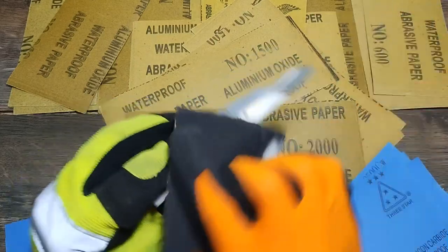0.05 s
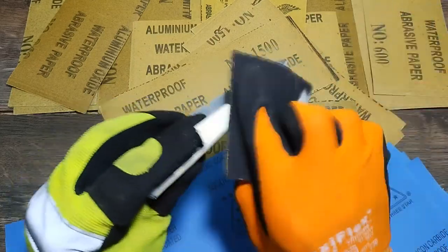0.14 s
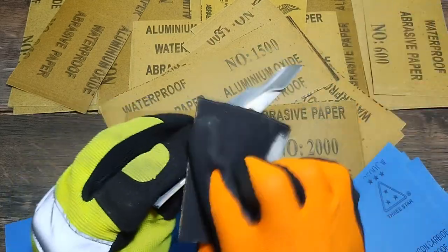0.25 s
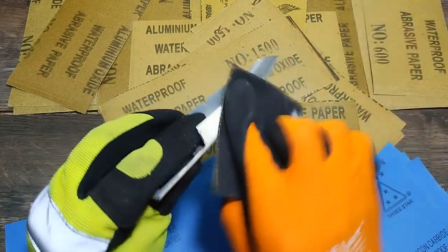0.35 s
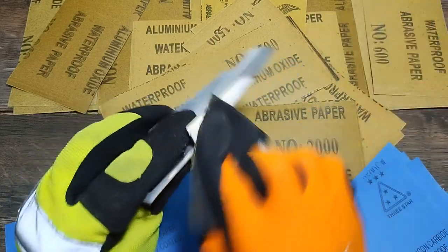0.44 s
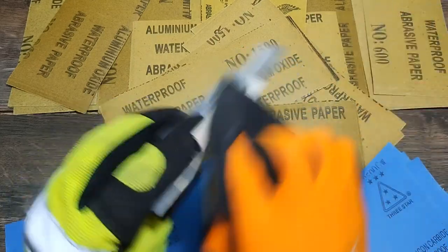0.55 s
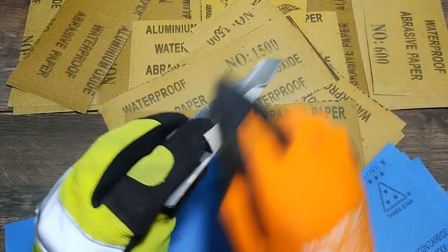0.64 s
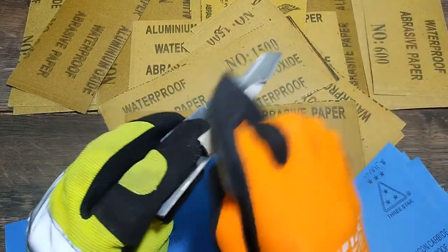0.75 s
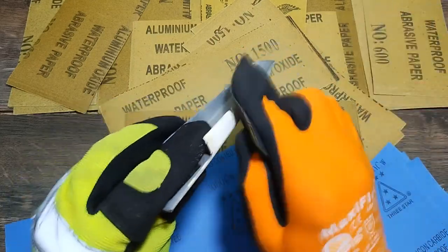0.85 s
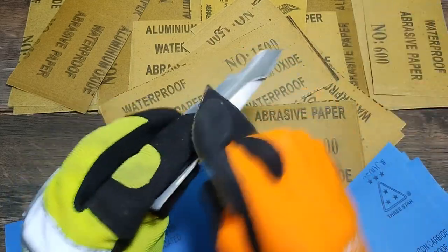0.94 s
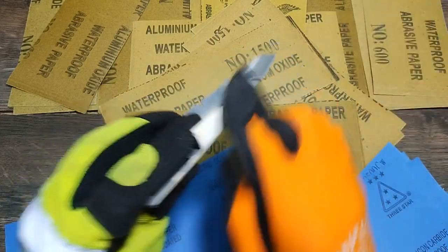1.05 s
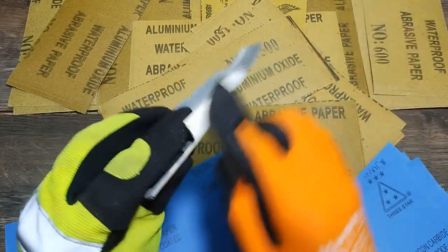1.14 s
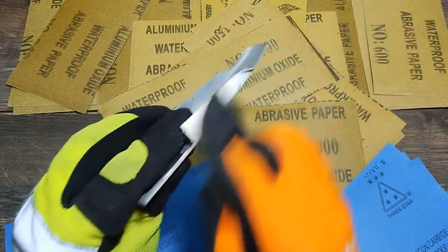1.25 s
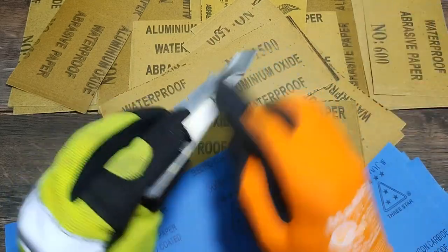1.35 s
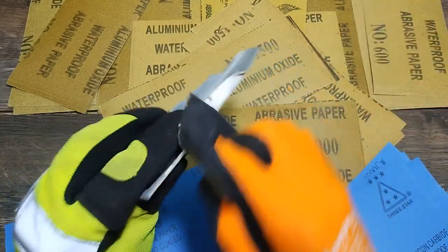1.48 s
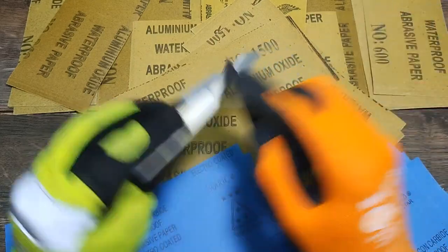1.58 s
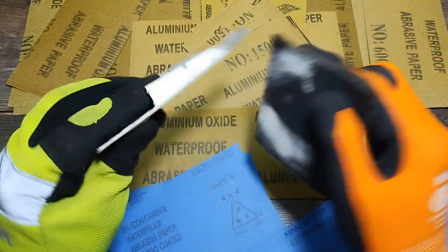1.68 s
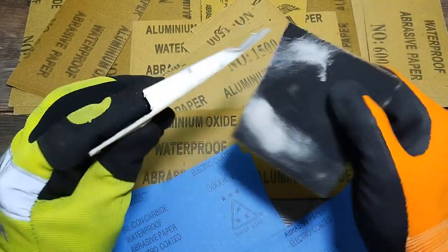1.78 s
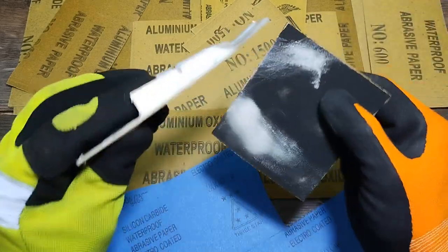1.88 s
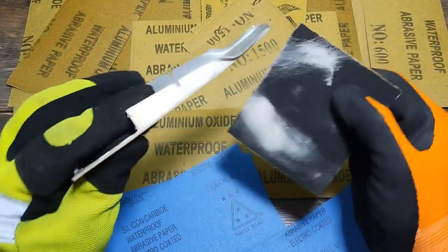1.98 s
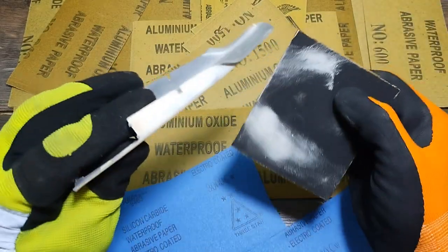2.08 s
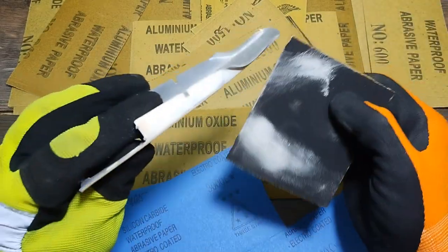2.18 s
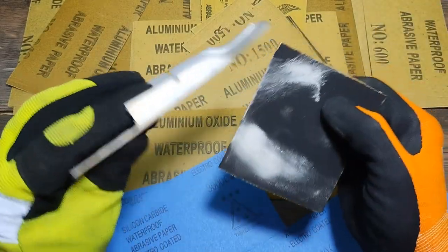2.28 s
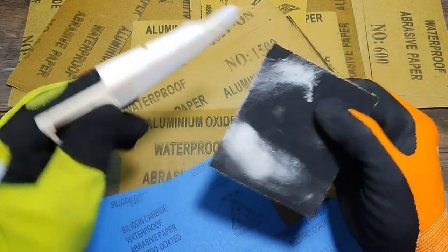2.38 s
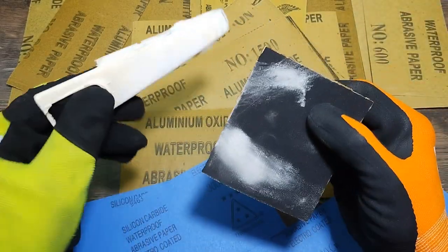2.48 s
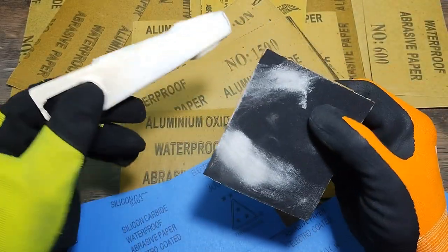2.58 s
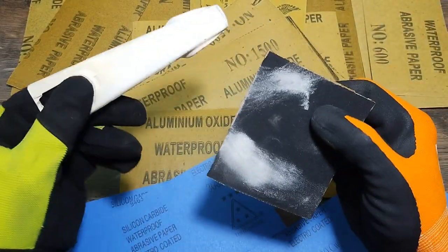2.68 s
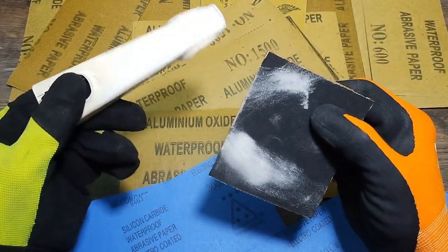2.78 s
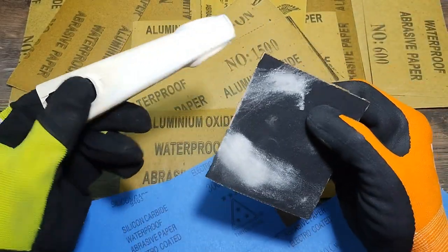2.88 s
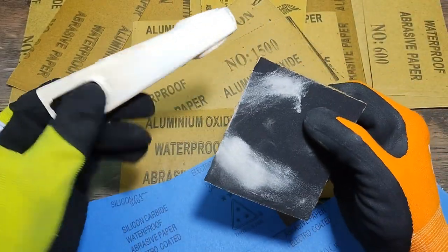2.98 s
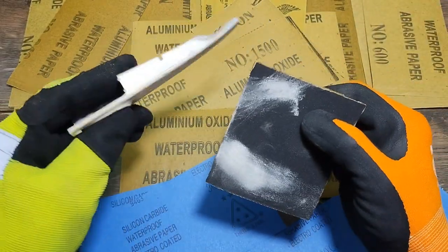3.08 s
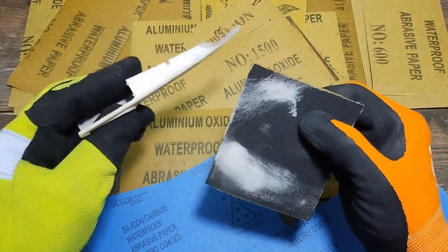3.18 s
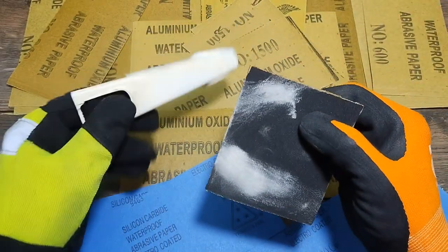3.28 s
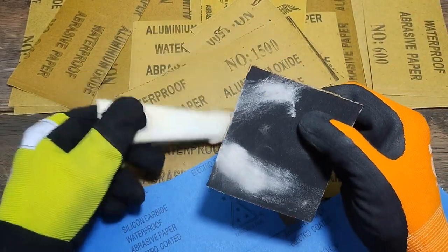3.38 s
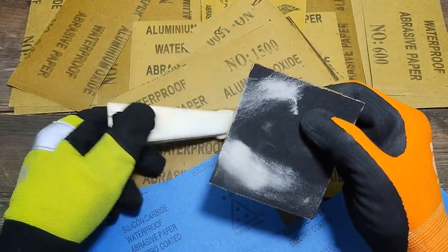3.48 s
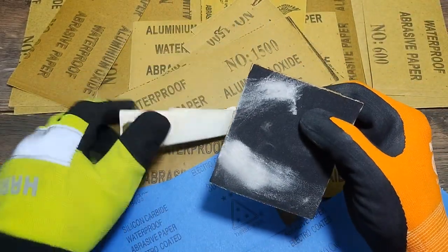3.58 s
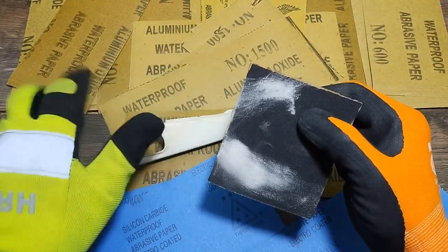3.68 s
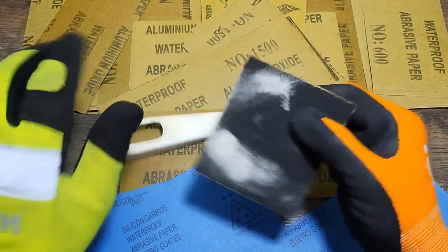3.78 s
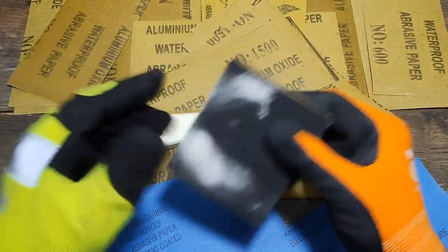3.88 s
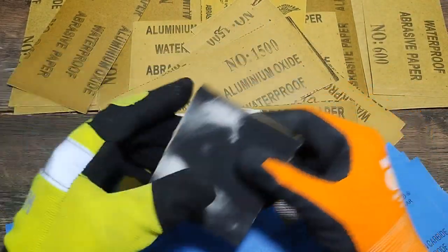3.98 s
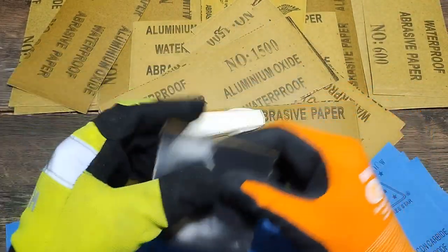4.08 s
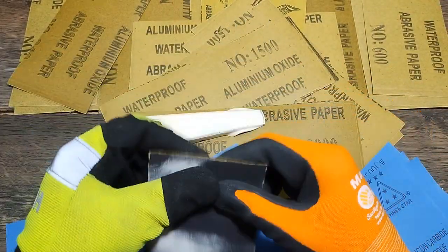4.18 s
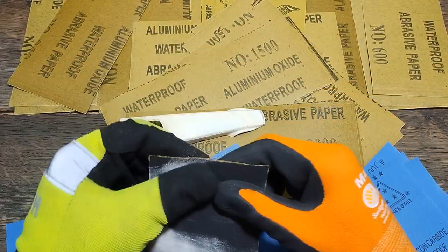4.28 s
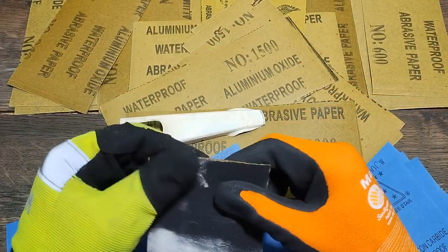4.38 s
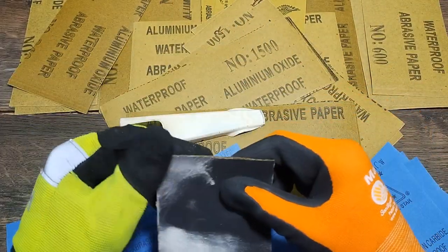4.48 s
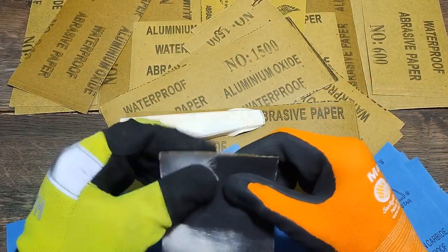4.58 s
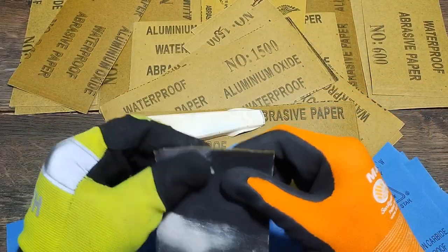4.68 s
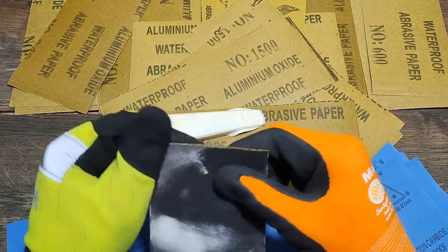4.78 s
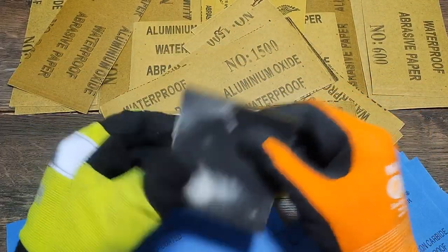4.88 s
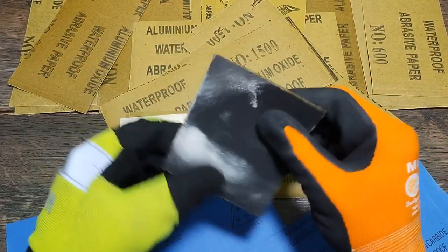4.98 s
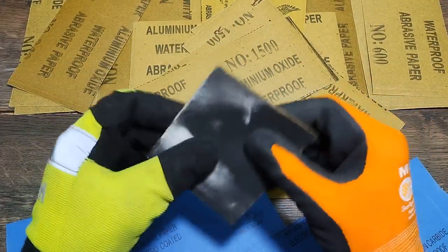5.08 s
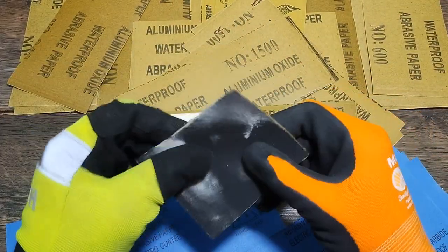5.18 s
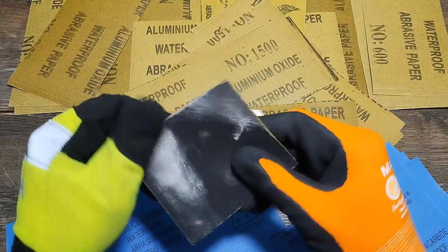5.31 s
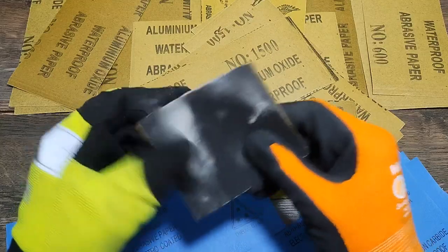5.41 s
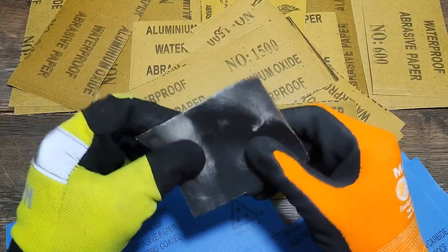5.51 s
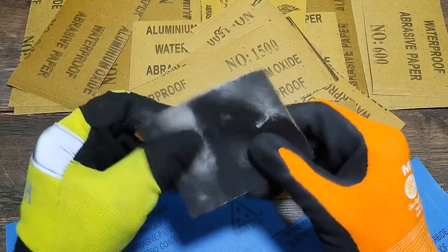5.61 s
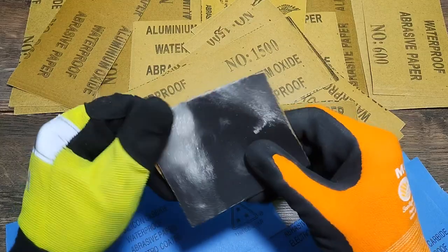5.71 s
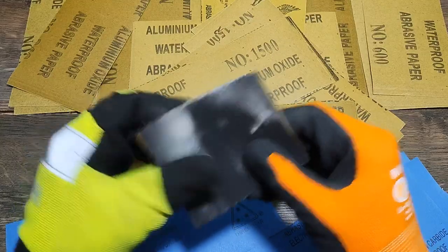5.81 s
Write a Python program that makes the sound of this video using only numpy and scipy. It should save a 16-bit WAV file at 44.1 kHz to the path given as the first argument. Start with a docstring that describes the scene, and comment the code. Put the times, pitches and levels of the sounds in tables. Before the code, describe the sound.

Close to the microphone at a workbench, a fast run of raspy sandpaper strokes works over a small piece of plastic, which ticks and knocks in the hand. The rubbing breaks off into soft glove movement, and the piece clicks down lightly. Scattered brushing swipes and tiny paper snaps follow as a finger cleans the sheet, growing stronger near the end. The room is quiet, with a faint electrical hum.

```python
"""Quick, hissing strokes of fine sandpaper on a small plastic part, heard close up at a workbench.
The grit sets part and sheet ringing; then the gloved hand stops, lays the part on the bench and wipes
the dust off the sheet with a finger. Room air and a mains hum lie underneath. The microphone has two
ports, the right one brighter."""
import sys
import numpy as np
from scipy import signal
from scipy.fft import rfft, irfft
from scipy.io import wavfile
from scipy.ndimage import uniform_filter1d

SR = 44100
rng = np.random.default_rng(int(sys.argv[2]) if len(sys.argv) > 2 else 0)


def bounce(signal):
    """Save signal as a 16-bit WAV file at the path given by the first command-line argument."""
    frames = np.transpose(np.atleast_2d(signal))
    limited = np.clip(frames, -1, 1)
    pcm = np.round(limited * 32767).astype(np.int16)
    wavfile.write(sys.argv[1], SR, pcm)


N = 257984


def from_db(db):
    return 10 ** (np.asarray(db) / 20)


def rms_one(x):
    return x / np.sqrt(np.mean(x ** 2) + 1e-20)


def filtered(x, hz, kind="band"):
    return signal.sosfilt(signal.butter(2, hz, kind, fs=SR, output="sos"), x)


def in_time(rows):
    """One curve over the whole scene for each column after the time."""
    s, *columns = np.transpose(rows)
    order = np.argsort(s, kind="stable")
    return [np.interp(np.arange(N) / SR, s[order], c[order]) for c in columns]


def at_hz(points):
    """Reads rows of frequency and value at every bin of an N-point transform."""
    hz, values = np.transpose(points)
    bin_hz = np.maximum(np.arange(N // 2 + 1) * SR / N, 1)
    return np.interp(np.log(bin_hz), np.log(hz), values)


def coloured(x, spectrum):
    return rms_one(irfft(rfft(x) * from_db(at_hz(spectrum)), N))


def drift(hz):
    """A random wander of unit spread, mostly slower than hz."""
    step, run_in = 8, 8000
    r = np.exp(-2 * np.pi * hz * step / SR)
    noise = rng.standard_normal(N // step + run_in + 2)
    slow = signal.lfilter([1], [1, -2 * r, r * r], noise)[run_in:]
    return np.interp(np.arange(N) / step, np.arange(len(slow)), rms_one(slow - slow.mean()))


def resonate(x, hz, width_hz):
    r = np.exp(-np.pi * width_hz / SR)
    gain = (1 - r * r) / 2
    return signal.lfilter([gain, 0, -gain], [1, -2 * r * np.cos(2 * np.pi * hz / SR), r * r], x)


def spread(pair):
    """Two unrelated signals become left and right, alike in the bass and unrelated in the treble."""
    # Likeness at the two ports. Each row: frequency in Hz, correlation.
    likeness = [(40, 1), (70, 0.69), (180, 0.86), (550, 0.49), (1200, 0.1), (2500, 0.42), (5000, 0)]
    alike = np.clip(at_hz(likeness), -1, 1)
    mid, side = rfft(pair)
    return irfft(np.sqrt(1 + alike) * mid + np.sqrt(1 - alike) * side * [[1], [-1]], N) / np.sqrt(2)


def hand_motion():
    """Each rub bites fast, swells, then fades; rubs add as powers and the loudest sets pitch and tilt."""
    # Sanding strokes. Each row: catch and swell time in seconds, hiss at the catch and after the swell
    # in dB, fade in dB/s, ring and flex against hiss in dB, ring pitch in Hz, treble tilt in dB/octave.
    strokes = [ (0.048, .046, -55.5, -56.5, 400, 2, -12, 1850, 3.5),
               (0.105, 0.051, -40.5, -32, 175.5, 5.5, -9, 2500, 0),
               (0.233, 0.068, -33, -27, 326, 1.5, -15.5, 2540, -1.5),
               (0.347, .046, -35, -26.5, 375, 0.5, -12.5, 2670, -1.5),
               (0.459, 0.049, -31.5, -33.5, 690, 1.5, -6, 2350, -3),
               (0.538, .04, -35.5, -31, 330, 0, -9.5, 2900, -2.5),
               (0.643, 0.019, -29.5, -32.5, 562.5, -1.5, -15, 2550, 1.5),
               (0.709, 0.014, -25, -25.5, 333.5, 2.5, -14.5, 2650, -2.5),
               (0.802, 0.037, -31, -31, 430.5, 0.5, -13, 2800, 0),
               (0.885, 0.057, -38, -38, 900, 4, -6, 2680, -2.5),
               (0.975, 0.044, -35.5, -34, 516, 2.5, -12.5, 2820, -3.5),
               (1.052, 0.042, -34, -29.5, 337, 1.5, -11.5, 3050, -3),
               (1.132, 0.014, -37.5, -25, 357.5, -1.5, -18.5, 3060, -1.5),
               (1.219, 0.04, -37.5, -36.5, 640, 4.5, -12, 2850, -0.5),
               (1.316, 0.031, -38, -39.5, 720, 2.5, -10.5, 2900, -1),
               (1.394, 0.058, -39, -36, 798, 1, -13.5, 3020, -1.5),
               (1.490, 0.051, -30.5, -30, 650.5, -4, -17.5, 3100, -1.5),
               (1.568, 0.046, -32.5, -33.5, 550.5, 1, -12.5, 2920, 0.5),
               (1.666, 0.044, -35, -36, 250.5, 1.5, -15, 2940, -1.5),
               (1.762, 0.00593, -33.5, -37.5, 651, -1, -6.5, 2700, -3.5), ]
    # Gloves shifting and a finger wiping the sheet, in the same columns.
    wipes = [ (1.915, .01, -65.5, -59.5, 132.7, 2, -7, 2090, -1),
             (2.290, .012, -77, -76.5, 300, -2, 4, 2300, 0.5),
             (2.47, .05, -76, -70.5, 60.5, 2, -6, 2400, -4.5),
             (2.87, 0.038, -81, -75, 500, -4, -6, 2300, -1),
             (3.125, .02, -70, -69, 250, -11, -12, 2320, -5),
             (3.40, 0.083, -79, -75.5, 89.5, -9, -10, 2150, -2.5),
             (3.62, 0.11, -69.5, -65, 340, -5, -5, 2330, -4),
             (4.004, 0.066, -69.5, -66, 400, -1, -6, 2900, -3),
             (4.15, 0.059, -79.5, -71.5, 220, -1, -11, 2500, -0.5),
             (4.27, 0.11, -73.5, -61.5, 170, -6, -12, 2500, 3.5),
             (4.43, 0.078, -65, -48, 780, -4.5, -19, 3320, 4),
             (4.53, .09, -59, -54.5, 506, -3.5, -11.5, 3200, 0),
             (4.68, .025, -71.5, -69, 40.4, 2.5, -1.5, 2900, -3.5),
             (4.82, 0.045, -80, -56, 500, -6, -20, 3130, -0.5),
             (4.872, 0.05, -45, -47, 490, 4, -8, 2900, -1),
             (4.975, 0.023, -69.5, -55, 470, 2.5, -8, 3000, -6),
             (5.09, .10, -69, -58, 503, -1, -12, 2880, -3.5),
             (5.197, .036, -50.5, -52.5, 700, -7, -30, 3140, 6),
             (5.31, 0.063, -62.5, -49, 504, -6, -25, 2780, -1),
             (5.385, 0.026, -38.5, -38.5, 400, 3, -16, 2700, 0.5),
             (5.45, .01, -66, -52.5, 175, 0.5, -12, 2720, -1),
             (5.643, .006, -49, -53.5, 200, -8, -14, 3000, 7),
             (5.754, .030, -40, -30, 299, -3, -17, 3200, -2),
             (5.814, .03, -46, -51, 199, 10.5, -4, 3040, -1), ]
    # Faint glove rustle between rubs. Each row: time in seconds, hiss in dB, ring and flex against
    # hiss in dB, treble tilt in dB/octave.
    rustle = [(0, -85.5, 6, 11, 7), (.1, -69.5, 8, -1, 1.5), (1.82, -75, 4, 8, 0.5),
              (2.05, -78, 13, 10, 3.5), (2.25, -86, 18.5, 18, 2.5), (2.42, -85, 10.5, 10, 3.5),
              (2.7, -76.5, -1, -2, 2.5), (2.95, -89, 7.5, 2, 6), (3.3, -98.5, 1, 7, 1.5),
              (3.6, -79.5, 2, 3, -1.5), (3.9, -71, 1, -2, -2.5), (4.25, -80, -1, 1, -8),
              (4.75, -74.5, 2, 0.5, 0), (5.07, -78, 3, -4, -0.5), (5.28, -71.5, 6, -8, 3),
              (5.6, -74.5, 9, -15, 2.5), (5.85, -68, -5, -10, 0.5)]
    stroke_bite_s, wipe_bite_s = 0.013, 0.014   # rise from silence to the catch
    rustle_hz, flicker_db = 2300, 4
    t = np.arange(N) / SR
    hiss_db, ring_db, flex_db, tilt_db = in_time(rustle)
    hiss = from_db(hiss_db + flicker_db * drift(8.2)) ** 2
    ring, flex = hiss * from_db(2 * ring_db), hiss * from_db(2 * flex_db)
    pitch, tilt = hiss * rustle_hz, hiss * tilt_db
    rubs = [(stroke_bite_s, *row) for row in strokes] + [(wipe_bite_s, *row) for row in wipes]
    for bite_s, s, swell_s, catch_db, end_db, fade, ring_db, flex_db, hz, tilt_db in rubs:
        near = slice(int(max(s - 0.1, 0) * SR), int((s + swell_s + 0.5) * SR))
        age = t[near] - s
        bite = np.clip(1 + age / bite_s, 0, 1)
        held_db = catch_db + (end_db - catch_db) * np.clip(age / swell_s, 0, 1)
        loss_db = fade * np.maximum(age - swell_s, 0)
        power = (bite * from_db(held_db - loss_db)) ** 2
        hiss[near] += power
        # ring and flex linger, gaining on the hiss up to a limit
        ring[near] += power * from_db(2 * (ring_db + np.minimum(0.1 * loss_db, 7.5)))
        flex[near] += power * from_db(2 * (flex_db + np.minimum(0.41 * loss_db, 11)))
        pitch[near] += power * hz
        tilt[near] += power * tilt_db
    hiss_db, ring_db, flex_db = 10 * np.log10([hiss, ring / hiss, flex / hiss])
    return hiss_db, ring_db, flex_db, pitch / hiss, tilt / hiss


def grit(per_s, size_db, clump_db, clump_hz):
    """Grains catch at random, unevenly and in clumps; each reaches the two ports by different paths."""
    caught = rng.random(N) < per_s / SR
    grain_db = size_db * np.minimum(rng.exponential(1, N), 5) + clump_db * drift(clump_hz)
    return spread(caught * from_db(grain_db) * rng.standard_normal((2, N)))


def grit_hiss(tilt_db):
    """Fine grit hisses; the sheet bends, so each third of an octave swells and fades on its own."""
    # Colour of the hiss. Each row: frequency in Hz, relative level in dB.
    spectrum = [(2060, -19.5), (3500, -2.5), (4030, -2.5), (5200, -4.5), (10700, -1.5), (14200, -10),
                (14700, -25), (15000, -47.5)]
    fine = grit(per_s=15000, size_db=-1, clump_db=0.5, clump_hz=82)
    edges_hz = 3000 * 2 ** np.arange(0, 2.4, 1 / 3)
    hiss = 0
    for k, (low, high) in enumerate(zip(edges_hz, edges_hz[1:])):
        gain_db = tilt_db * np.log2(low / 7500) + 2 * drift(19)
        hiss += (-1) ** k * from_db(gain_db) * filtered(fine, [low, high])
    return coloured(hiss, spectrum)


def part_and_sheet_ring(hiss_db, focus_hz):
    """Grit drives the resonances of part and sheet: a light touch only rustles, a firm one rings."""
    # The resonances. Each row: frequency in Hz, width in Hz, relative level in dB.
    resonances = [(1607, 120, -5), (1736, 50, 1.5), (1910, 140, 0.5), (2307, 300, 3), (2845, 140, 4),
                  (3007, 110, 3), (3175, 250, 1.5), (3360, 170, -5), (3300, 130, -11.5), (4010, 600, -3)]
    # A loosely held part rings low, the bare sheet in a narrow range. Each row: time in seconds,
    # lift of the lowest resonances in dB, narrowing in dB per octave squared.
    grip = [(0, 8, 4), (.2, 0.5, -17), (.27, 8.5, 8), (.5, 9, 12), (.6, -1.5, 3), (1.8, 6, 9.5),
            (4.3, -2.5, 30), (4.9, 2, 13), (5.4, 1, 24), (5.85, -2, 15)]
    loose_db, narrow_db = in_time(grip)
    coarse = rms_one(grit(per_s=9000, size_db=0, clump_db=-0.5, clump_hz=27))
    firm = np.clip((hiss_db + 75.5) / 18, 0, 1)
    rustle = from_db(-17.5) + (1 - firm) * from_db(-19.5)
    ring = rustle * filtered(coarse, [1550, 4600])
    power = rustle ** 2 * 3200   # times the noise bandwidth in Hz
    for k, (hz, width, db) in enumerate(resonances):
        damped_db = narrow_db * np.log2(hz / focus_hz) ** 2   # the grip damps those far from its pitch
        gain = firm * from_db(db - damped_db + loose_db * (hz < 1850) + 3 * drift(4.7))
        ring += (-1) ** k * gain * resonate(coarse, hz, width)
        power += gain ** 2 * width * np.pi / 2
    ring /= np.sqrt(2 * power / SR)   # the grip moves the colour, not the level
    return filtered(ring, [1350, 5500])


def paper_flex():
    """The paper flexes under the catching grit with a low rasp."""
    # Colour of the rasp. Each row: frequency in Hz, relative level in dB.
    spectrum = [(50, -19.5), (70, -13), (206, -16.5), (242, -7), (461, -7.5), (601, -5.5), (842, -7),
                (1080, -0.5), (1350, -2.5), (1650, -8.5), (3000, -56)]
    return coloured(grit(per_s=3000, size_db=-1, clump_db=-2, clump_hz=30), spectrum)


def knocks():
    """A knock strikes all the part's modes, most those near the pitch that the struck spot favours."""
    # Fingers or bench hit the part. Each row: time in seconds, relative level in dB, favoured Hz.
    hits = [(0.11, -15, 620), (.113, -14, 1660), (.28, -21, 686), (.378, -17.5, 835), (0.39, -24, 330),
            (.488, -17.5, 630), (.7008, -9, 1750), (.7022, -11, 2500), (.7035, -15, 600),
            (.7045, -13, 2900), (.7060, -12, 2900), (.7076, -13, 2500), (1.114, -25, 590),
            (1.57, -21.5, 724), (1.733, -21, 2780), (1.762, -16.5, 1270), (3.567, -41, 1200),
            (3.609, -59, 504), (3.809, -32, 2500), (3.8097, -30.5, 323), (3.813, -35.5, 2500),
            (3.8175, -36, 2200), (3.811, -40, 730), (3.816, -36.5, 290), (3.821, -33.5, 1060),
            (3.939, -43, 1500), (3.946, -45.5, 2200), (4.344, -31.5, 900), (4.35, -38, 1110),
            (5.79, -26, 1250)]
    # Modes of the plastic. Each row: frequency in Hz, relative level in dB, seconds to fall 60 dB.
    modes = [(302, -2, 0.07), (426.7, -4.5, 0.081), (600, 0.5, 0.049), (749, -1, .04), (1085, 2.5, 0.019),
             (1285, -4, 0.062), (1517, -5, 0.058), (1697, 1, 0.015), (2194, 9, 0.0051), (2615, 6, 0.026),
             (3420, 1, .02), (4090, -5.5, 0.016)]
    s, hit_db, spot_hz = np.transpose(hits)
    port_db = rng.normal(0, 0.5, (len(s), len(modes), 2))   # a little different at each port
    out = np.zeros((2, N))
    for k, (hz, mode_db, t60) in enumerate(modes):
        strike_db = hit_db + mode_db - 14 * np.log2(hz / spot_hz) ** 2 - 13.5
        clicks = np.full((2, N), 1e-18)
        clicks[:, (s * SR).astype(int)] = from_db(strike_db[:, None] + port_db[:, k]).T
        if hz > 2500 and k % 2:   # some high modes face the ports with opposite sides
            clicks[1] *= -1
        r, w = from_db(-60 / (t60 * SR)), 2 * np.pi * hz / SR
        out += (-1) ** k * signal.lfilter([0, np.sin(w)], [1, -2 * r * np.cos(w), r * r], clicks)
    return filtered(out, 220, "high")


def snaps():
    """Paper and glove snap dryly: a crack of a few milliseconds and a tail of bright noise."""
    # Each row: time in seconds, relative level in dB, seconds for the tail to fall 60 dB.
    cracks = [(0.0423, -51, 0.05), (0.1078, -18.5, 0.08), (0.7015, -17.5, 0.055), (1.908, -46, 0.05),
              (2.3272, -48, 0.05), (3.568, -45.5, 0.073), (3.808, -32, 0.13), (3.9385, -38, 0.15),
              (4.331, -48, 0.05), (4.366, -43.5, 0.06), (4.3874, -58, 0.065), (4.7137, -45, 0.05),
              (4.7583, -43, 0.05), (5.379, -29, 0.05), (5.5116, -41, 0.05), (5.638, -52, 0.066),
              (5.6895, -44, 0.05), (5.7432, -30.5, 0.05)]
    t, envelope = np.arange(N) / SR, np.zeros(N)
    for s, db, t60 in cracks:
        age = np.maximum(t - s, 0)
        crack, tail = from_db(-60 * age / 0.027), 1.1 * from_db(-60 * age / t60)
        envelope += (t >= s) * from_db(db - 12) * (crack + tail)
    return filtered(envelope * rng.standard_normal((2, N)), [2500, 13000])


def room_air():
    """Air noise in the room around the bench, wavering slightly."""
    # Colour of the air. Each row: frequency in Hz, relative level in dB.
    spectrum = [(15, -42.5), (25, -21.5), (115, -6), (191, -12.5), (250, -5), (354, -5.5), (450, -12),
                (621, -9), (927, -16.5), (1060, -10), (1180, -18), (2020, -17.5), (11200, -38.5),
                (13800, -39), (15000, -59)]
    return from_db(-64.5 + 0.7 * drift(3.7)) * coloured(spread(rng.standard_normal((2, N))), spectrum)


def mains_hum():
    """Wavering tones near multiples of the mains frequency, alike at both ports."""
    # Each row: frequency in Hz, level in dB.
    tones = [(59.2, -72), (118.4, -74), (177.6, -77), (242.2, -70), (360.7, -69.5)]
    t, hum = np.arange(N) / SR, np.zeros(N)
    for hz, db in tones:
        level = from_db(db + 4.5 * drift(5.5))
        phase = 2 * np.pi * hz * (t + 0.0008 * drift(3.5)) + 0.51 * drift(3)
        hum += level * np.sin(phase)
    return hum


def scene():
    """Handwork at the bench in front, and behind it a room tone that swells with the loud rubbing."""
    hiss_db, ring_db, flex_db, focus_hz, tilt_db = hand_motion()
    hiss = grit_hiss(tilt_db)
    ring = from_db(ring_db) * part_and_sheet_ring(hiss_db, focus_hz)
    flex = from_db(flex_db) * paper_flex()
    rubbing = from_db(hiss_db) * (hiss + ring + flex)
    swell_from_db, swell_share, swell_s = -59.5, 0.4, 0.033
    loud_db = 10 * np.log10(uniform_filter1d(from_db(2 * hiss_db), int(swell_s * SR)) + 1e-12)
    swell = from_db(swell_share * np.maximum(loud_db - swell_from_db, 0))
    return rubbing + knocks() + snaps() + swell * (room_air() + mains_hum())


def record(dry):
    """Each microphone port has its own colour, the right hears a little late; bass and top are cut."""
    # Balance of the ports. Each row: frequency in Hz, left minus right in dB.
    balance = [(60, 1.5), (130, -2.5), (290, -1), (640, -0.5), (1410, -1.5), (3090, 3.5), (6800, -9),
               (15000, -9.5)]
    low_cut_hz, top_cut_hz, lag_samples = 48, 15100, 3
    ports = irfft(rfft(dry) * from_db(at_hz(balance) / 2 * np.array([[1], [-1]])), N)
    ports[1] = np.roll(ports[1], lag_samples)
    ports = filtered(ports, low_cut_hz, "high")
    return signal.sosfilt(signal.cheby2(16, 70, top_cut_hz, fs=SR, output="sos"), ports)


dry = scene()
out = record(dry)
bounce(out)
```